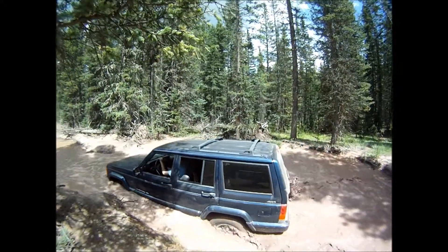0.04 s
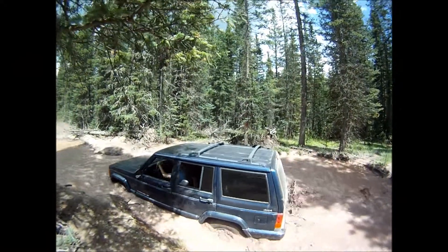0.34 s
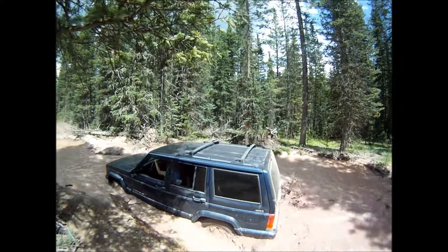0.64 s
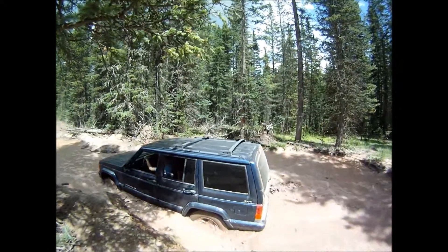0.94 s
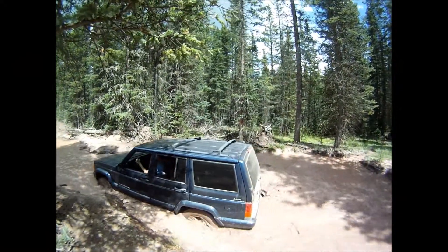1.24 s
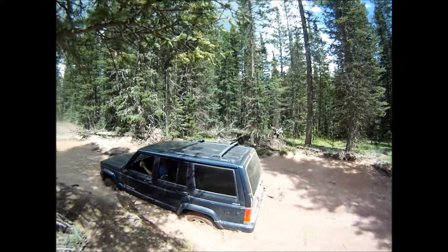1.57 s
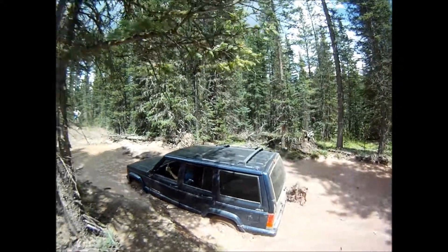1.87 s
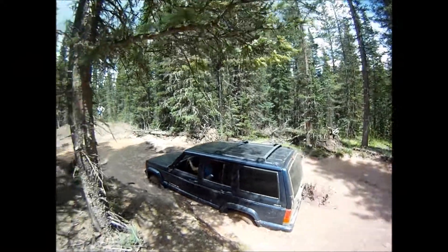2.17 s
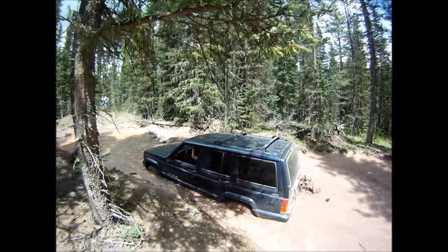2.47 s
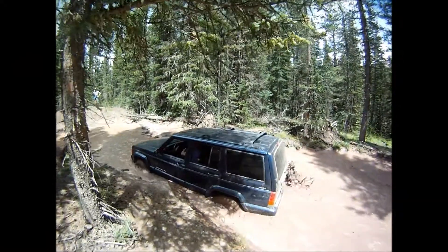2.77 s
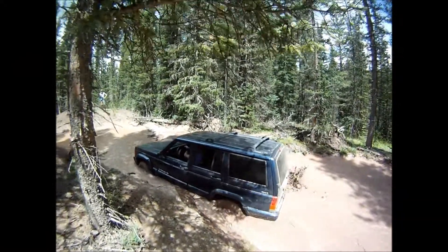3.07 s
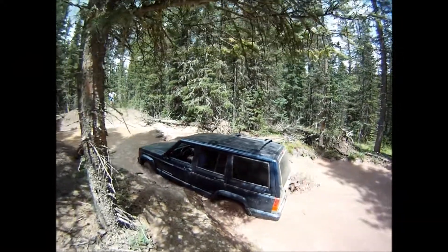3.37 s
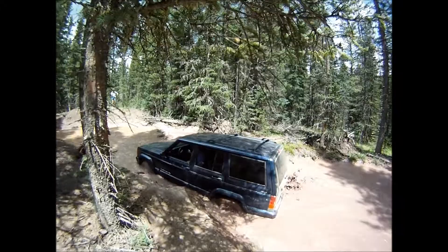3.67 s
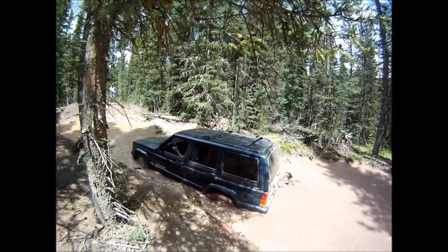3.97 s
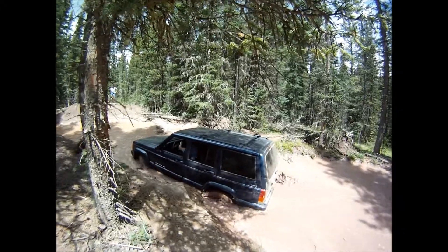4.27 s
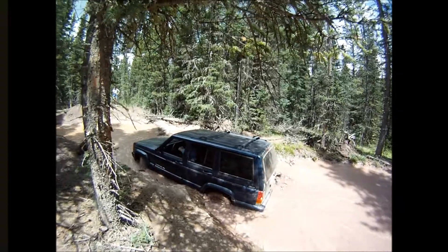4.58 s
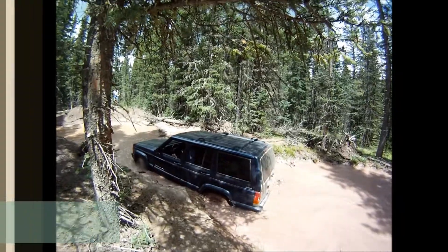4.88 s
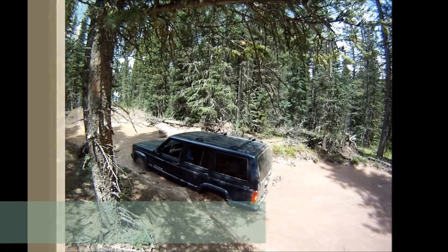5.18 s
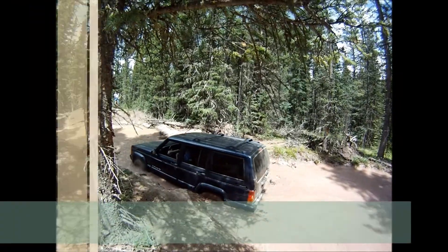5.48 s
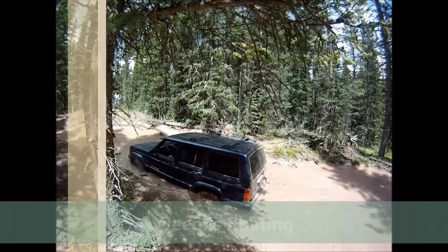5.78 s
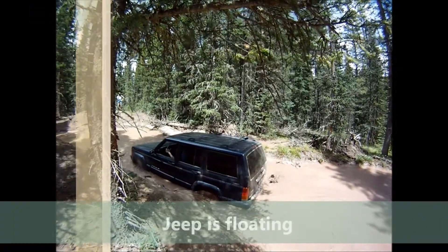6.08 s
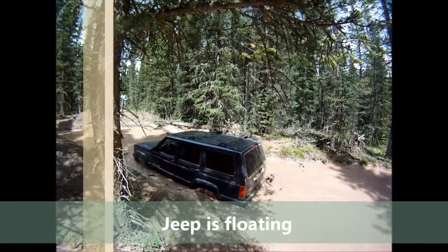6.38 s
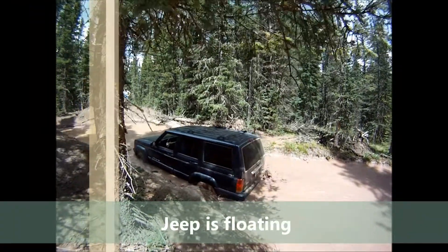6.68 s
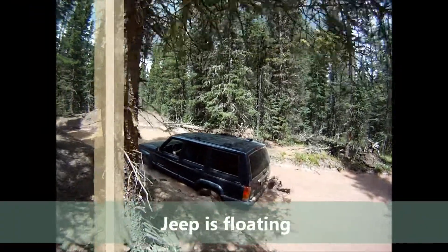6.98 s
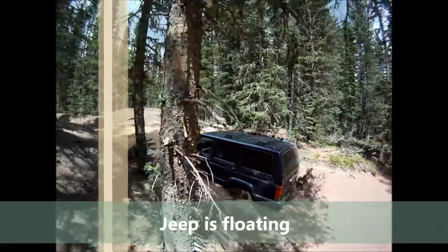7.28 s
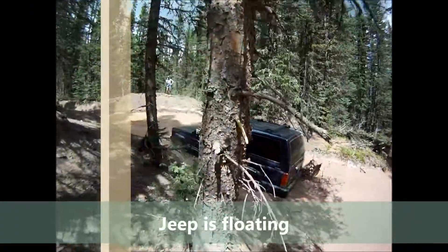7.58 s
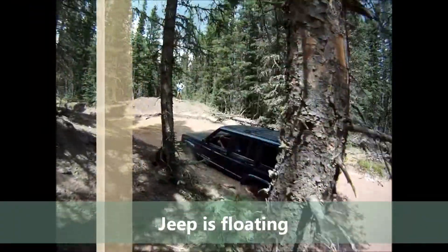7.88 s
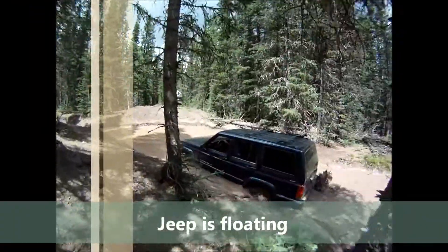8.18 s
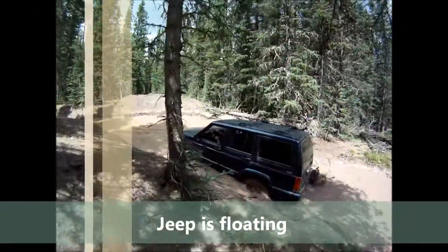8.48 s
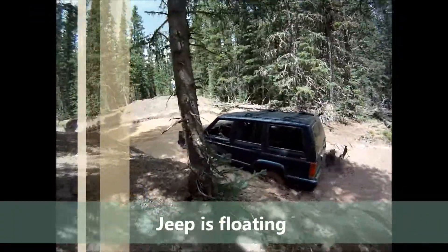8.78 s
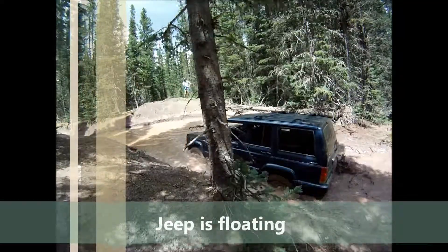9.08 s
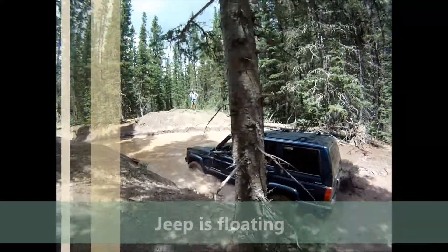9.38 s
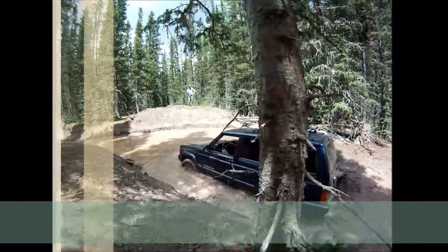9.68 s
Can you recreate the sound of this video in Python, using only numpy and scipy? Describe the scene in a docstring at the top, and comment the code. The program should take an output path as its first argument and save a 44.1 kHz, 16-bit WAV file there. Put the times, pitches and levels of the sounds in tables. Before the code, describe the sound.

Outdoors, water sloshes and trickles around an off-road vehicle while its engine rumbles low, with a thin fan whirr and rhythmic bubbling from the sunken tailpipe. The bubbling fades for a while. Late on, twigs drag across the microphone's plastic housing in a short, very loud burst of scratches, cracks and knocks. A few small ticks follow, and the distant exhaust bubbles up again.

```python
"""A four-wheel-drive wallows at idle in a flooded mud hole: its exhaust glugs under the water, the fan
whirrs and muddy water washes and trickles round the wheels. After 3.5 s the glugs sink back.
From about 7 s the hand-held camera moves past a tree: dry twigs scrape and snap against its hollow
plastic case, hard enough to overload the microphone between 8 and 8.6 s. The twigs thin out to
light ticks and the glugging comes forward again."""
import sys
import numpy as np
from scipy import signal
from scipy.fft import rfft, irfft, next_fast_len
from scipy.io import wavfile
from scipy.ndimage import map_coordinates

SR = 44100
rng = np.random.default_rng(int(sys.argv[2]) if len(sys.argv) > 2 else 0)


def inscribe(sig):
    """Save sig as 16-bit PCM at rate SR to the path in sys.argv[1].

    A 1-D sig is mono; a 2-D sig holds one channel per row.
    Samples are clipped to [-1, 1] before scaling.
    """
    pcm = np.round(np.clip(np.atleast_2d(sig).T, -1, 1) * 32767)
    wavfile.write(sys.argv[1], SR, pcm.astype(np.int16))


N = 433944

# modes of the hollow plastic case: (centre [Hz], width [Hz], level [dB])
CASE_MODES = [(319.3, 226, -17), (724, 400, -10.5), (952, 347, -3), (1128, 205, -5), (1576, 177, -7.5),
              (1880, 225, -8.5), (2095, 344, 0), (2270, 360, -12.5), (2720, 690, -21.5), (3720, 473, -14.5),
              (8320, 700, -20.5), (9853, 430, -11.5), (10880, 660, -21.5), (13360, 504, -23),
              (14040, 240, -13.5), (14400, 370, -23)]


def amp(db):
    """Decibels to linear gain."""
    return 10 ** (np.asarray(db) / 20)


def unit(x):
    """x at rms 1."""
    return x / np.sqrt(np.mean(x ** 2) + 1e-20)


def curve(rows):
    """Automation through (time [s], value) points, one value per sample."""
    return np.interp(np.arange(N) / SR, *np.transpose(rows))


def wobble(rate):
    """A smooth random curve, rate knots a second."""
    knots = rng.standard_normal(int(N * rate / SR) + 4)
    coarse = np.arange(0, N, 32)
    return np.interp(np.arange(N), coarse, map_coordinates(knots, [coarse * rate / SR]))


def filtered(x, response):
    """x times a complex response of frequency."""
    m = next_fast_len(N + SR // 2)
    return irfft(rfft(x, m) * response(np.fft.rfftfreq(m, 1 / SR)), m)[:N]


def coloured(x, points):
    """x through an EQ of (frequency [Hz], gain [dB]) points on a log axis, at rms 1."""
    f, db = np.transpose(points)
    return unit(filtered(x, lambda hz: amp(np.interp(np.log(hz + 1), np.log(f), db))))


def resonance(hz, centre, width):
    """Causal response of one mode, 1 at its centre."""
    return 1j * hz * width / (centre ** 2 - hz ** 2 + 1j * hz * width)


def add(track, s, sound):
    """Mix a sound into the track from time s."""
    part = track[max(round(s * SR), 0):][:len(sound)]
    part += sound[:len(part)]


def whirr(centre_hz=2060, width_hz=260, flutter_db=1.9):
    """The cooling fan and belt: a narrow, fluttering band of rushing air."""
    # swell of the whirr: (time [s], level [dB])
    fan_levels = [(0, -55.5), (.75, -58), (1.1, -68), (1.55, -65), (1.9, -58.5), (2.4, -57), (4.2, -61.5),
                  (4.8, -67), (6.8, -67.5), (7.3, -60), (9.84, -57)]
    band = unit(filtered(rng.standard_normal(N), lambda hz: resonance(hz, centre_hz, width_hz) ** 2))
    return band * amp(curve(fan_levels) + flutter_db * wobble(20))


def bubbles(per_second, pitch_hz, spread, cycles, rise, size_db, count=4000):
    """Random bubbles of rms 1: damped tones that climb as they near the surface."""
    t = np.arange(SR // 40) / SR
    start = np.cumsum(rng.exponential(SR / per_second, count)).astype(int)
    hz = pitch_hz * np.exp(spread * rng.standard_normal((count, 1)))
    size = amp(size_db * np.minimum(rng.exponential(size=(count, 1)), 4))
    age = t * hz / cycles
    climb = 1 + rise * np.minimum(age, 2)
    rings = size * np.sin(2 * np.pi * hz * t * climb) * age * np.exp(-np.pi * age)
    positions = start[:, None] + np.arange(len(t))
    return unit(np.bincount(positions.ravel(), rings.ravel(), N)[:N])


def water(hiss_db=-1.14, slosh_db=-5.0, slosh_follows=0.78, fizz=0.23, plops=0.098):
    """A hiss with fine bubbles over a lower slosh with larger ones; one wash drives both."""
    # how hard the water washes round the wheels: (time [s], level [dB])
    wash_levels = [(0, -52.5), (.7, -53.5), (1.4, -56), (2.3, -53.5), (2.8, -56.5), (3.5, -54), (4, -57.5),
                   (4.5, -58), (5.2, -62.5), (5.7, -60.5), (6.75, -61.5), (7.2, -56.5), (7.7, -55.5),
                   (8.8, -57), (9.15, -53.5), (9.84, -56.5)]
    # colour of the bright trickle: (frequency [Hz], gain [dB])
    hiss_eq = [(400, -58), (1100, -14.5), (1500, -0.5), (1650, -5.5), (2450, 1), (2850, -8), (3200, 0),
               (3500, -8.5), (5400, -8.5), (6000, -17), (6700, -10.5), (10500, -13.5), (12000, -23.5),
               (15000, -13)]
    # colour of the muddy slosh: (frequency [Hz], gain [dB])
    slosh_eq = [(120, -3), (330, -0.5), (550, -3), (850, -0.5), (1200, 3), (1400, -7.5), (2000, -11.5),
                (4000, -30)]
    # airborne sound rings in the camera case: (centre [Hz], width [Hz], gain [dB])
    cavity = [(1970, 330, 7.5), (3708, 113, 16.5), (8310, 100, 14), (9870, 140, 13.5), (13900, 340, 11)]
    wash_db = curve(wash_levels)
    flow_db = wash_db.mean() + slosh_follows * (wash_db - wash_db.mean())
    fine = bubbles(per_second=380, pitch_hz=2540, spread=.7, cycles=5.5, rise=.08, size_db=3.8)
    hiss = coloured(rng.standard_normal(N) + fizz * fine, hiss_eq)
    hiss = filtered(hiss, lambda hz: 1 + sum((amp(db) - 1) * resonance(hz, c, w) for c, w, db in cavity))
    large = bubbles(per_second=120, pitch_hz=954, spread=.3, cycles=10, rise=.058, size_db=3.5,
                    count=1500)
    slosh = coloured(rng.standard_normal(N) + plops * large, slosh_eq)
    flicker_db = 0.54 * wobble(7.6) + 1.2 * wobble(30)
    hiss = unit(hiss) * amp(wash_db + hiss_db + flicker_db)
    lapping_db = .9 * wobble(6.2)
    return hiss + slosh * amp(flow_db + slosh_db + lapping_db)


def glug_events(timing_s=.005, scatter_db=1):
    """(time [s], level [dB]) of every glug: each run keeps its pace, with a little scatter."""
    # runs of glugs: (start [s], end [s], rate [1/s], first level [dB], last level [dB])
    runs = [(.02, .43, 6.1, -50, -48), (.527, .87, 7.3, -43.5, -47.5), (.995, 1.17, 10, -42, -49),
            (1.277, 1.6, 7.8, -42.5, -42), (1.745, 3.46, 6.11, -50.5, -48.5), (3.72, 4.45, 6.1, -58, -58),
            (5.44, 6.16, 6.3, -59, -56), (6.29, 6.82, 6.5, -52.5, -52.5), (7.28, 7.7, 5.9, -55, -47),
            (8.98, 9.85, 6.25, -52, -45)]
    rows = []
    for start, end, rate, first_db, last_db in runs:
        times = np.arange(start, end, 1 / rate)
        rows += zip(times, np.linspace(first_db, last_db, len(times)))
    return rows + rng.standard_normal((100, 2))[:len(rows)] * [timing_s, scatter_db]


def glugs(phase, gain_db=2, swell_s=0.023, froth=0.54, climb_hz_per_s=150, detune_hz=11, third_db=-9):
    """Gas from the sunken tailpipe rings near firing harmonics 2 and 3 and climbs as it surfaces."""
    # ring of a gas pocket: (frequency [Hz], gain [dB])
    pocket_eq = [(40, -9), (90, 2.5), (150, -4.5), (200, -9.5), (250, -9.5), (330, -38), (600, -57),
                 (1500, -84)]
    t = np.arange(N) / SR
    churn = coloured(rng.standard_normal(N) * (1 + np.cos(phase)) ** 2, pocket_eq)
    gulps, swells = np.zeros(N), np.zeros(N)
    for (s, db), (bend, turn) in zip(glug_events(), rng.uniform(-1.02, 1, (100, 2))):
        near = np.abs(t - s) < 4 * swell_s
        u = t[near] - s
        swell = amp(db) * np.exp(-(u / swell_s) ** 2 / 2)
        drift = 2 * np.pi * (detune_hz * bend * u + climb_hz_per_s * u ** 2 / 2 + turn)
        ring = np.sin(2 * phase[near] + drift) + amp(third_db) * np.sin(3 * phase[near] + drift)
        gulps[near] += swell * ring
        swells[near] += swell
    return amp(gain_db) * (gulps + froth * swells * churn)


def rumble(gain_db=3, heave_db=1.8):
    """The engine's low rumble, heaving through the water."""
    # weight of the rumble: (time [s], level [dB])
    rumble_levels = [(0, -57), (1.2, -66.5), (1.9, -58), (3, -61.5), (4.4, -61), (5.5, -61.5), (6.6, -58.5),
                     (7.2, -54.5), (9, -54.5), (9.84, -54)]
    # its dark colour: (frequency [Hz], gain [dB])
    rumble_eq = [(15, -1.5), (45, 5), (110, 2), (200, -4), (380, -11.5), (700, -19), (2000, -76)]
    level_db = curve(rumble_levels) + gain_db + heave_db * wobble(9)
    return coloured(rng.standard_normal(N), rumble_eq) * amp(level_db)


def engine(jitter=0.02483, flutter_db=3.0, note_db=-5.0):
    """Uneven idle firings sound a low note and pulse the glugs, over the rumble."""
    # idle speed: (time [s], firing rate [Hz])
    firing_rates = [(0, 74.8), (1.3, 77.74), (1.8, 80.1), (2.3, 77.8), (3.2, 74.7), (6.5, 71.24),
                    (8.7, 72.44), (9.84, 70.9)]
    # the firing note, loudest while the tailpipe lies shallow: (time [s], level [dB])
    note_levels = [(0, -60), (.2, -51.5), (.85, -54), (1.05, -48.5), (1.5, -47), (1.65, -52), (2, -51.5),
                   (2.5, -56), (3.5, -67), (4.1, -58), (5, -68), (5.6, -61), (6.7, -63), (7.1, -52),
                   (7.7, -72), (8.8, -52), (9.3, -50.5), (9.84, -49)]
    # its harmonics: (multiple of the firing rate, level [dB])
    harmonics = [(1, 2), (2, -8.5), (3, -10), (4, -20.5)]
    firing_hz = curve(firing_rates) * (1 + jitter * wobble(16))
    phase = 2 * np.pi * np.cumsum(firing_hz) / SR
    note = np.zeros(N)
    for k, db in harmonics:
        strength = amp(db + flutter_db * np.sqrt(k) * wobble(28))
        note += strength * np.sin(k * phase + rng.uniform(0, 2 * np.pi))
    note *= np.sqrt(2) * amp(curve(note_levels) + note_db)
    return note + rumble() + glugs(phase)


def bumps(gain_db=-2, ring_s=0.018, rise_s=0.0019, rub=0.91):
    """Dull pushes on the whole camera: a short hollow ring with a low rub."""
    # the camera bumped in the hand: (time [s], level [dB], ring pitch [Hz])
    jolts = [(6.92, -41.5, 150), (7.004, -34.5, 315), (7.258, -39, 330), (7.358, -39.5, 200),
             (7.567, -41.5, 317), (7.829, -36, 318), (7.914, -24, 279), (8.002, -26, 333),
             (8.114, -29, 308), (8.152, -24.5, 187), (8.282, -23.5, 135.8), (8.329, -23, 321),
             (8.424, -27.5, 357.3), (8.486, -30, 168.3), (8.601, -25.5, 155.1), (8.953, -36.5, 264)]
    # colour of the rub: (frequency [Hz], gain [dB])
    rub_eq = [(30, -13), (100, -5.5), (160, -2), (230, -8.5), (340, -5.5), (500, -13.5), (1200, -51)]
    t = np.arange(SR // 8) / SR
    swell = (1 - np.exp(-t / rise_s)) * np.exp(-t / ring_s)
    rings, push = np.zeros(N), np.zeros(N)
    for s, db, hz in jolts:
        add(rings, s, amp(db) * swell * np.sin(2 * np.pi * hz * t))
        add(push, s, amp(db) * swell)
    rubbing = coloured(rng.standard_normal(N), rub_eq)
    return amp(gain_db) * (rings + rub * push * rubbing)


def case_response(hz, stretch=1):
    """One row per mode of the case; the sound passes wall and cavity, so each ring swells briefly."""
    # dead bands of the microphone port: (centre [Hz], width [Hz])
    notches = [(490, 60), (6000, 4900), (12000, 1500)]
    centre, width, db = np.transpose(CASE_MODES)[:, :, None]
    port = np.prod([1 - resonance(hz, c, w) for c, w in notches], axis=0)
    return amp(db) * resonance(hz, centre * stretch, width) ** 2 * port


def drag(attack_s=0.005, release_s=0.00655):
    """Envelope of the dragging twigs: each stroke grips, holds and lets go."""
    # twig strokes over the case: (start [s], length [s], level [dB])
    strokes = [(2.387, 0.029, -47), (6.567, 0.078, -54), (6.895, 0.24, -54.5), (7.005, .022, -43.5),
               (7.246, 0.084, -47.5), (7.546, 0.036, -45.5), (7.652, 0.1, -56.5), (7.831, 0.037, -40.5),
               (7.918, 0.068, -39), (8, .012, -20), (8.107, 0.025, -29.5), (8.156, .025, -27),
               (8.192, 0.332, -34.5), (8.549, 0.035, -34), (8.598, 0.0076, -15.5), (8.684, 0.044, -48),
               (8.754, 0.24, -55.5), (9.285, 0.056, -49), (9.6, .04, -51)]
    t = np.arange(SR) / SR
    attack = np.minimum(t / attack_s, 1)
    strength = np.zeros(N)
    for s, length, db in strokes:
        release = np.exp(-np.maximum(t - length, 0) / release_s)
        add(strength, s, amp(db) * attack * release)
    return strength


def scrape(grit_db=4, slips_per_s=2400, flutter_db=4.8):
    """Dragging twigs slip in tiny uneven ticks that keep the case ringing."""
    sizes = amp(grit_db * np.clip(rng.standard_normal(N), -2, 2)) * rng.choice([-1, 1], N)
    ticks = (rng.random(N) < slips_per_s / SR) * sizes * amp(flutter_db * wobble(120))
    ring = irfft(case_response(np.fft.rfftfreq(SR // 10, 1 / SR)).sum(0))
    return drag() * unit(signal.oaconvolve(ticks, ring)[:N])


def flicks(per_second=35, over_drag_db=2, scatter_db=2.5, hardness_spread_db=6,
           floor_db=-56, ceiling_db=-23, count=600):
    """Small random contacts thrown off while a twig drags: (time [s], level [dB], hardness [dB])."""
    times = np.cumsum(rng.uniform(0, 2, count)) / per_second
    size, hardness = rng.standard_normal((2, count))
    strength = np.interp(times, np.arange(N) / SR, drag(), right=0)
    drag_db = 20 * np.log10(strength + 1e-9)
    level_db = np.minimum(drag_db + over_drag_db + scatter_db * size, ceiling_db)
    heard = level_db > floor_db
    return list(zip(times[heard], level_db[heard], hardness_spread_db * hardness[heard]))


def knocks(scatter_db=2, detune=0.048, pivot_hz=1400, edge=0.02, edge_hz=2600,
           catch=0.079, catch_s=0.0033, chatter=0.23, chatter_s=0.0039, ticks_per_s=3500):
    """Each contact catches, strikes, chatters and rings the case; hard ones favour its upper modes."""
    # twig snaps and finger taps: (time [s], level [dB], hardness as treble over bass [dB])
    contacts = [(2.3923, -44, -16), (4.0506, -44.5, -27), (4.205, -52, -16), (7.011, -36, -1),
                (7.263, -32, -8), (7.2746, -35.5, 20), (7.363, -22.5, 6.5), (7.832, -31, -15),
                (7.8606, -30, 9), (7.914, -11.5, 1), (7.979, -20, -4), (8.0039, -6.5, 3.5),
                (8.0436, -10.5, 6), (8.0543, -5.5, 8), (8.0902, -26, -3), (8.1055, -18, -2),
                (8.1228, -12.5, 8), (8.1342, -20, 5), (8.1575, -14, 3.5), (8.1707, -6, 5),
                (8.2182, -3.5, 5), (8.2639, -10, 2.5), (8.2713, -14.5, 3), (8.2905, -13.5, 8),
                (8.3041, -10.5, 4), (8.325, -15.5, 6), (8.3348, -7, -1), (8.3731, -15.5, 7),
                (8.3881, -4.5, 5.5), (8.4237, -6, 9), (8.4375, -9.5, 12.5), (8.4826, -16.5, -0.5),
                (8.499, -6, 14), (8.5177, -24.5, -5), (8.5554, -31, -8), (8.5684, -21, 0),
                (8.586, -11.5, 11), (8.701, -30, 2), (8.7923, -38.5, 15), (8.807, -37, -2),
                (8.8964, -37, 0), (8.9764, -37.5, -10), (9.045, -35.5, 12), (9.2938, -38.5, -31),
                (9.3648, -41, 5), (9.3875, -39.5, -2), (9.4454, -32, 0), (9.462, -27.5, 14),
                (9.7044, -40.5, -2), (9.82, -39, 0), (9.833, -31.5, 5)]
    centre = np.transpose(CASE_MODES)[0][:, None]
    lead = SR // 100  # room for the catch ahead of the strike
    t = (np.arange(SR // 10) - lead) / SR
    hz = np.fft.rfftfreq(len(t), 1 / SR)
    octaves = np.clip(np.log2(centre / pivot_hz), -.7, .4)
    grip = np.where(t < 0, catch * np.exp(-np.abs(t) / catch_s), chatter * np.exp(-np.abs(t) / chatter_s))
    blows = np.zeros(N)
    for s, db, hardness_db in list(contacts) + flicks():
        # the spot that is struck sets the strength and sign of each mode
        spot = amp(scatter_db * rng.standard_normal(centre.shape)) * rng.choice([-1, 1], centre.shape)
        # the twig's load shifts the low modes most
        stretch = 1 + detune * rng.standard_normal() * np.minimum(pivot_hz / centre, 1)
        force = grip * rng.standard_normal(len(t)) * (rng.random(len(t)) < ticks_per_s / SR)
        force[lead] = 1  # the strike
        # a stronger blow has more top
        tilt_db = (hardness_db - 2.5) * octaves + edge * (db + 4.5) * (centre > edge_hz)
        response = (spot * amp(tilt_db) * case_response(hz, stretch)).sum(0)
        ring = irfft(rfft(force) * response)
        attack_rms = np.std(ring[lead:][:SR // 200])
        add(blows, s - lead / SR, amp(db) * ring / attack_rms)
    return blows


def scene():
    """The vehicle and water some way off, the twigs right on the camera; mono."""
    return (water() + whirr() + engine() + scrape() + bumps() + knocks())[None]


def record(dry, top_hz=15500):
    """The microphone clips at full scale; the camera cuts off steeply above its band limit."""
    clipped = np.clip(dry[0], -1, 1)
    return np.array([filtered(clipped, lambda hz: 1 / (1 + (hz / top_hz) ** 80))])


dry = scene()
out = record(dry)
inscribe(out)
```